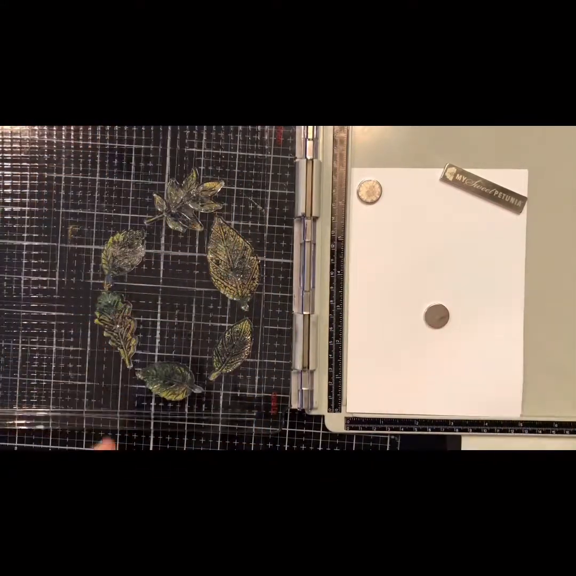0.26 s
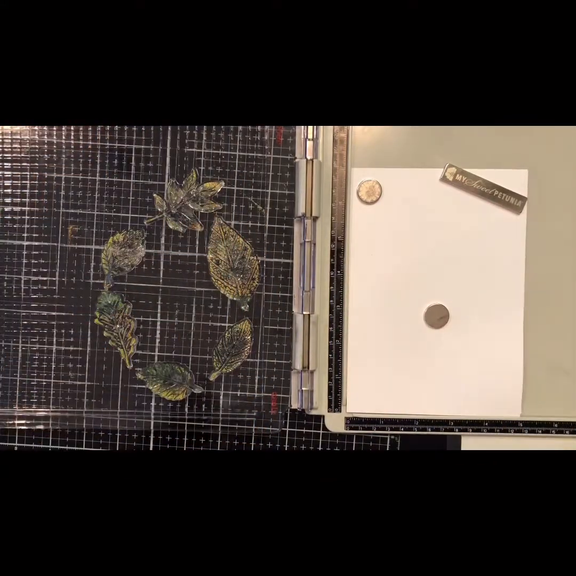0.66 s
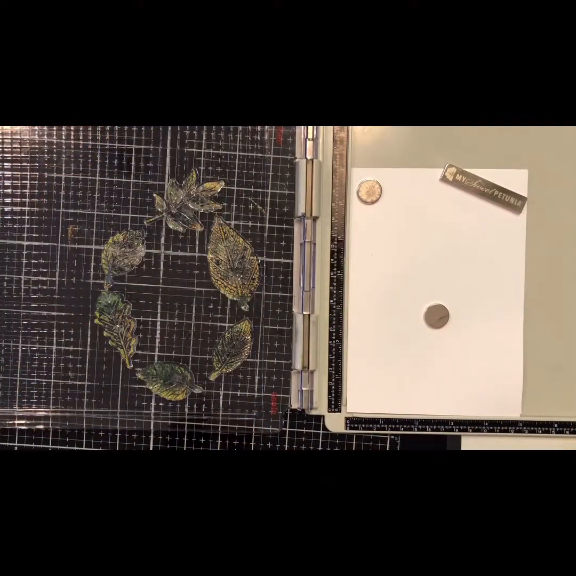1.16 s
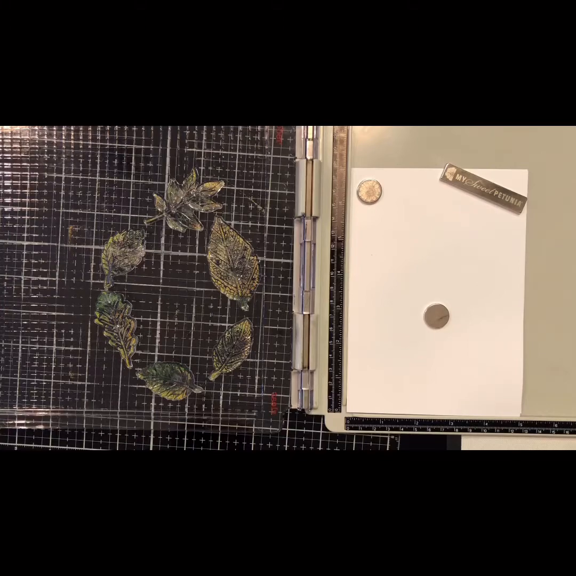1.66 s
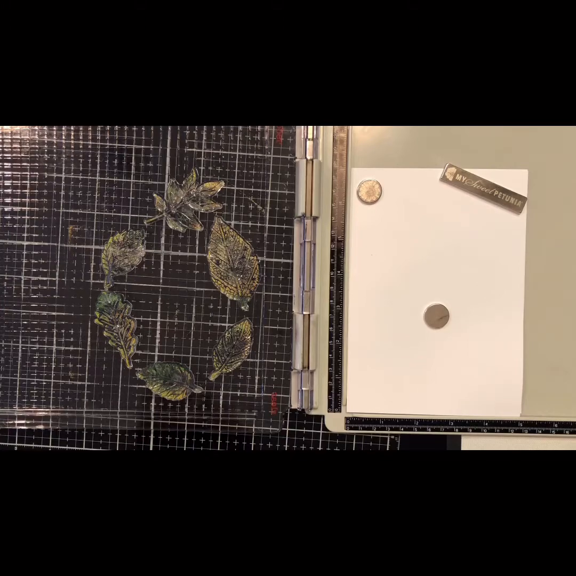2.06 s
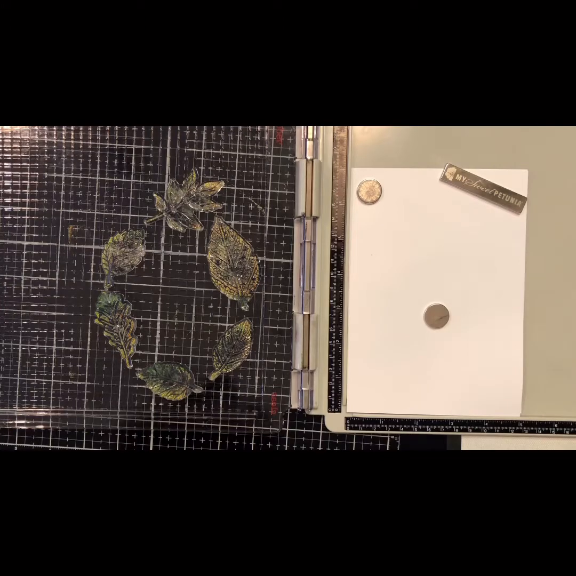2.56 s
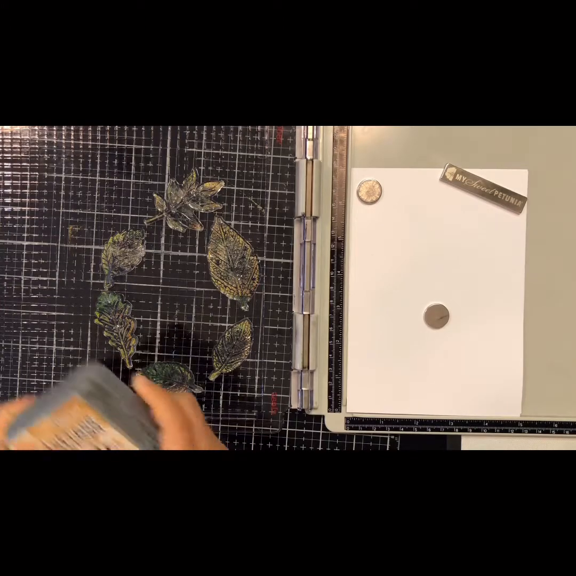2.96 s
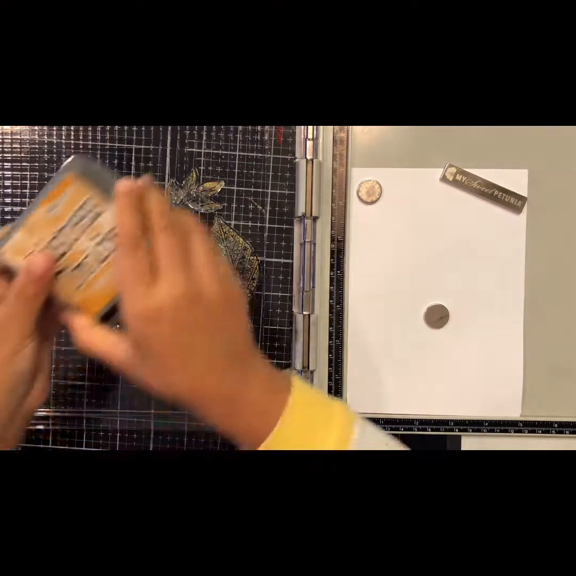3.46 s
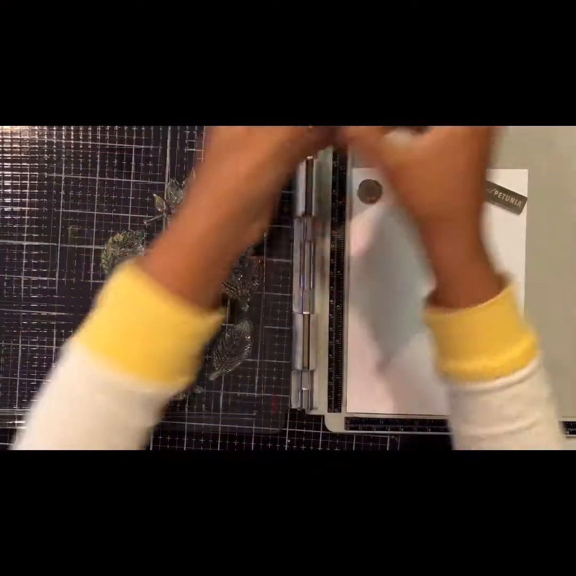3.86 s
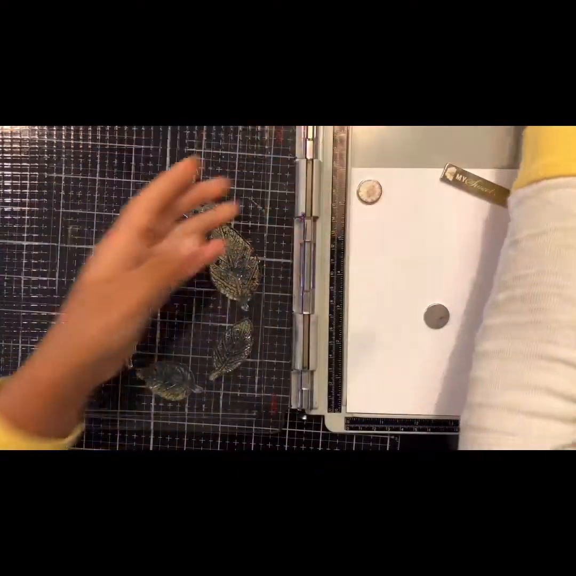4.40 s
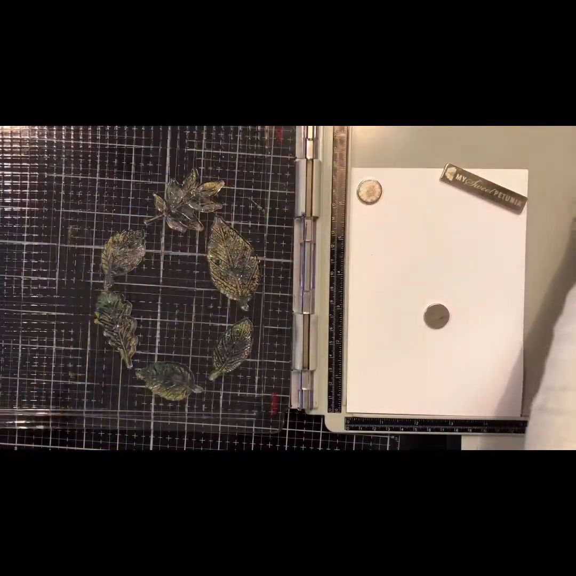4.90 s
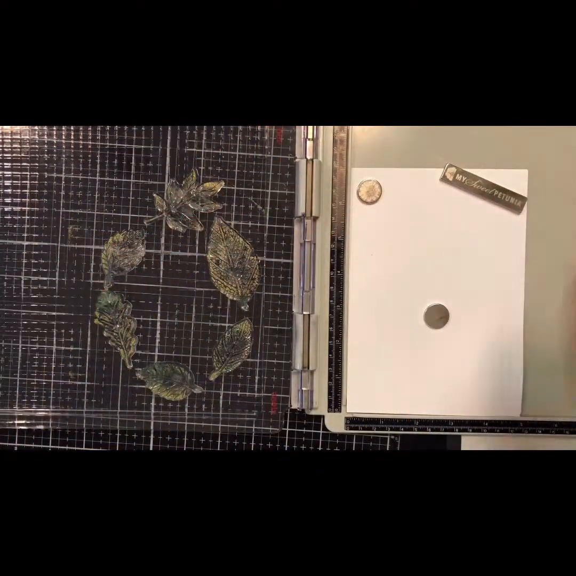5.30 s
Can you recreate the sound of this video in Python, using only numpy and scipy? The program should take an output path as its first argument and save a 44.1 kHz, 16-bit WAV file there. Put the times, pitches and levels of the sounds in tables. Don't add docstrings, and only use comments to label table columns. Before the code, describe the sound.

Quiet handling of plastic cases: one snap and a few hard knocks, then a pause with small ticks, then a loud clattering cluster.

```python
import sys
import numpy as np
from scipy import signal
from scipy.fft import rfft, irfft, next_fast_len
from scipy.io import wavfile
from scipy.ndimage import uniform_filter1d, map_coordinates

SR = 44100
rng = np.random.default_rng(int(sys.argv[2]) if len(sys.argv) > 2 else 0)


def transcribe(u):
    v = np.clip(np.atleast_2d(u).T, -1, 1)
    q = np.round(v * 32767).astype(np.int16)
    wavfile.write(sys.argv[1], SR, q)


def voltage_ratio(level):
    return 10 ** (np.asarray(level, float) / 20)


N = 244311
FAINT_TOP_HZ = 15950


def unit(x):
    return x / np.sqrt(np.mean(x ** 2) + 1e-20)


def along(points, hz):
    f, v = np.transpose(points)
    return np.interp(np.log(hz + 1), np.log(f + 1), v)


def wobble(rate):
    knots = rng.standard_normal(int(N * rate / SR) + 4)
    return map_coordinates(knots, [np.arange(N) * rate / SR])


def filtered(x, response):
    m = next_fast_len(len(x) + 4096)
    return irfft(rfft(x, m) * response(np.fft.rfftfreq(m, 1 / SR)), m)[:len(x)]


def peak(f, hz, width):
    return 1j * f * width / (hz * hz - f * f + 1j * f * width)


def modes(body):
    return lambda f: sum((-1) ** k * voltage_ratio(db) * peak(f, hz, width) for k, (hz, width, db) in enumerate(body))


def add(track, s, sound):
    part = track[round(s * SR):][:len(sound)]
    part += sound[:len(part)]


def rush(spectrum, grain_db, patchy_db):
    grainy = voltage_ratio(grain_db * wobble(700)) * rng.standard_normal(N)
    z = signal.stft(grainy, nperseg=512)[2]
    field = uniform_filter1d(rng.standard_normal(z.shape), size=4, axis=0)
    field = uniform_filter1d(field, size=10, axis=1)
    grains = signal.istft(z * voltage_ratio(patchy_db * unit(field)), nperseg=512)[1][:N]
    return unit(filtered(grains, lambda hz: voltage_ratio(along(spectrum, hz))))


def scrape(ms, size):
    u = np.arange(size) / SR / (abs(ms) / 3000)
    burst = rng.standard_normal(size) * u * np.exp(-u)
    for _ in range(3):
        z = rfft(burst)
        even = irfft(z / (np.abs(z) + 0.042 * np.abs(z).mean()), size)
        burst = even * (1 - np.exp(-4 * u)) * np.exp(-u / 4)
    return burst


def share_db(pitch_hz, layer_hz, fall_db, fall_up_db):
    octaves = np.log2(layer_hz / pitch_hz)
    return -fall_up_db * octaves if octaves > 0 else fall_db * octaves


# (frequency [Hz], decay by 60 dB [s])
WALL_DECAY = [(250, 0.77), (800, 0.49), (2000, 0.39), (5500, 0.42), (15000, 0.14)]


def walls():
    hz, t, z = signal.stft(rng.standard_normal(SR // 3), SR, nperseg=256)
    decay = voltage_ratio(-60 * t / along(WALL_DECAY, hz)[:, None])
    tail = signal.istft(z * decay, SR, nperseg=256)[1]
    t = np.arange(len(tail)) / SR
    tail = tail * np.clip(t / 0.0025, 0, 1) * (1 + 1.9 * np.exp(-t / 0.0066))
    return tail / np.linalg.norm(tail)


def evened(response, blur):
    return response / (np.abs(response) + 1e-3) ** blur


def knocks(body, far, hits, room_db, blur, grip_ms):
    out = np.zeros(N)
    for s, db, scrape_ms, hard_hz, wet_db in hits:
        soft = lambda f: 1 / (1 + 1j * f / hard_hz) ** 2
        blow = filtered(scrape(scrape_ms, size=2048), lambda f: modes(body)(f) * soft(f))
        ms = np.arange(len(blow)) / SR * 1000
        blow = blow * np.exp(-(ms / (abs(scrape_ms) + abs(grip_ms))) ** 2)
        blow = voltage_ratio(db) * blow / np.abs(blow).max()
        echo = filtered(walls(), lambda f: evened(modes(far)(f) * soft(f), blur) * (f < FAINT_TOP_HZ))
        add(out, s, blow)
        add(out, s, voltage_ratio(room_db + wet_db) * echo * np.linalg.norm(blow) / np.linalg.norm(echo))
    return out


# (frequency [Hz], density [dB per Hz])
AIR_COLOUR = [(15, -68.5), (25, -44.5), (48, -18), (118, -13), (138, -6.5), (266, -6.5), (296, -6),
              (470, -9.5), (952, -20), (1150, -30.5), (1280, -22.5), (2210, -36), (15200, -53.5),
              (16500, -54.5)]
# (frequency [Hz], level [dB rms])
FAN_LINES = [(59.2, -71), (149, -60.5), (186, -62.5), (237, -61.5), (296, -62), (355.5, -63),
             (414.5, -62.5), (545, -69)]
AIR_DB = -52.5


def room_tone():
    t = np.arange(N) / SR
    hum = np.zeros(N)
    for hz, db in FAN_LINES:
        level = voltage_ratio(db + 1.5 + 2.12 * wobble(14))
        hum += level * np.sin(2 * np.pi * hz * t + 0.65 * wobble(4) + 6 * rng.random())
    air_level = voltage_ratio(AIR_DB - 1.5 + 0.42 * wobble(5.6))
    return hum + air_level * rush(AIR_COLOUR, grain_db=-0.4, patchy_db=2.5)


# (start [s], hold [s], level [dB], pitch [Hz])
RUB_STROKES = [(0, 0.057, -64, 5000), (0.224, 0.058, -56, 714), (0.63, 0.59, -66, 2200),
               (1.695, 0.059, -58.5, 1110), (1.777, 0.027, -68.5, 6000), (1.923, 0.1, -70, 4460),
               (2.068, 0.044, -54.5, 1200), (2.11, 0.062, -65, 3700), (2.312, 0.11, -56, 1060),
               (2.447, 0.07, -66.5, 2000), (2.636, 0.15, -62.5, 4530), (2.9, 0.033, -63.5, 3860),
               (2.956, 0.055, -48, 930), (3.018, 0.059, -57, 3900), (3.14, 0.018, -61, 800),
               (3.237, 0.0084, -62, 2600), (3.333, 0.35, -66, 1670), (3.69, 0.09, -54.5, 1200),
               (1.506, 0.48, -76, 2410), (3.185, 0.0087, -66.5, 1800), (0.756, .03, -65, 8000),
               (4.17, 1.1, -68, 2160), (5.306, 0.11, -61.5, 4200), (5.487, 0.031, -49.5, 970)]
STROKE_RISE_DB_PER_S, STROKE_FADE_DB_PER_S = 348, 229
STROKE_FALL_DB, STROKE_FALL_UP_DB = 5.5, 12


def strokes(layer_hz, rest_db):
    t = np.arange(0, N / SR + .002, .002)
    power = voltage_ratio(2 * rest_db)
    for s, hold, db, pitch_hz in RUB_STROKES:
        rise_db = STROKE_RISE_DB_PER_S * np.maximum(s - t, 0)
        fade_db = STROKE_FADE_DB_PER_S * np.maximum(t - s - hold, 0)
        layer_db = db + share_db(pitch_hz, layer_hz, STROKE_FALL_DB, STROKE_FALL_UP_DB)
        power = power + voltage_ratio(2 * (layer_db - rise_db - fade_db))
    return np.interp(np.arange(N) / SR, t, np.sqrt(power))


# (frequency [Hz], density [dB per Hz])
PALM = [(250, -17.5), (500, 2), (950, 5), (1500, -8.5), (3000, -44.5)]
FINGERTIP = [(900, -28), (1700, 7), (2600, -0.5), (4200, -7), (7000, -18.5)]
CLOTH = [(2350, -33.5), (4000, -1), (6310, -3.5), (8540, -6.5), (15100, -7), (16200, -13.5), (16500, -52.5)]
# level of palm, fingertip, cloth [dB]
RESTING = (-64.5, -78.5, -84)


def rubbing():
    slips = wobble(90)
    palm = strokes(570, RESTING[0]) * voltage_ratio(0.6 * slips) * rush(PALM, grain_db=2.0, patchy_db=2.3)
    skin = strokes(2200, RESTING[1]) * voltage_ratio(1.2 * slips) * rush(FINGERTIP, grain_db=1.5, patchy_db=3.0)
    cloth = strokes(7200, RESTING[2]) * voltage_ratio(0.73 * slips) * rush(CLOTH, grain_db=-1.0, patchy_db=0.3)
    return palm + skin + cloth


# (time [s], peak [dB])
THUMB_CRACKLES = [(1.9924, -58), (2.0114, -58), (2.1894, -52), (2.3434, -58), (2.3524, -55), (2.3614, -57),
                  (2.3664, -57), (2.3714, -57), (2.3774, -58), (2.3824, -63), (2.4414, -63), (2.4448, -50),
                  (2.4544, -59), (2.4838, -54), (2.6494, -61), (2.6894, -54), (2.7194, -56), (3.0094, -44),
                  (3.0394, -54), (3.0594, -54)]
CRACKLE_MS, CRACKLE_DB = 0.75, -2


def crackles():
    out = np.zeros(N)
    for s, db in THUMB_CRACKLES:
        part = filtered(scrape(CRACKLE_MS, size=256), lambda f: peak(f, 5300, 16000))
        add(out, s, voltage_ratio(db + CRACKLE_DB) * part / np.abs(part).max())
    return out


# (time [s], peak [dB], pitch [Hz])
FINGER_TICKS = [(.525, -55.5, 3900), (.9793, -54, 6500), (1.001, -47, 1400), (1.6535, -46.5, 15000),
                (1.61, -57, 8400), (1.661, -63, 4500), (2, -44, 3500), (1.749, -48, 4100),
                (1.79, -42, 2300), (1.769, -52, 14000), (1.6, -52, 3200), (1.886, -54, 2900),
                (1.9256, -52, 3100), (1.5, -39, 3000), (2.1064, -44, 10000), (2.4, -40, 1700),
                (2.5, -54, 12000), (2.2693, -45, 2500), (2.285, -51, 1800), (2.2056, -57, 13000),
                (2.4065, -57, 4500), (2.416, -62, 7000), (5.4055, -59, 4700), (2.4843, -41, 1500),
                (.5779, -48, 1300), (2.539, -49, 1420), (2.297, -52, 1400), (3.5, -48, 3300),
                (2.8, -39, 2900), (4.092, -55.5, 3300), (3.7, -49, 1400), (2.7642, -49.5, 4000),
                (4.154, -40, 2000), (4.1655, -46, 2300), (4.913, -40, 1100)]
TICK_MS = 2.8
TICK_FALL_DB, TICK_FALL_UP_DB = 12.5, 9


def ticks():
    out = np.zeros(N)
    for s, db, pitch_hz in FINGER_TICKS:
        push = scrape(TICK_MS, size=512)
        for hz, width in [(1400, 1600), (3400, 3800), (6500, 5000), (12500, 8000)]:
            part = filtered(push, lambda f: peak(f, hz, width) ** 2)
            part_db = db + share_db(pitch_hz, hz, TICK_FALL_DB, TICK_FALL_UP_DB)
            add(out, s, voltage_ratio(part_db) * part / np.abs(part).max())
    return out + voltage_ratio(-21.5) * signal.fftconvolve(out, walls())[:N]


# (time [s], slips per second [Hz], level [dB], snap [dB])
THUMB_CREAKS = [
    [(2.324, 150, -59, -84), (2.35, 118, -56, -78), (2.386, 210, -58, -76)],
    [(2.436, 170, -66, -70), (2.46, 190, -68, -74)],
    [(2.9, 150, -61, -78), (2.93, 160, -57, -71), (2.97, 180, -59, -69), (3.0, 187, -50, -77.5),
     (3.035, 187, -51.5, -80), (3.047, 270, -49, -89)],
    [(5.458, 270, -60, -76), (5.475, 260, -55, -68), (5.495, 220, -51.5, -65), (5.515, 220, -52.5, -65),
     (5.54, 165, -49, -65)],
]
# (frequency [Hz], width [Hz], level [dB])
HELD_CASE = [(487, 360, -2), (1110, 360, 3), (2500, 1700, -24)]


def creaks():
    out, t = np.zeros(N), np.arange(N) / SR
    for rows in THUMB_CREAKS:
        s, rate, db, snap_db = np.transpose(rows)
        turns = np.cumsum(np.interp(t, s, rate) * (1 + .02 * wobble(60))) / SR
        slips = np.diff(np.floor(turns), prepend=0) * voltage_ratio(1.5 * rng.standard_normal(N))
        snaps = filtered(slips, lambda f: 1 / (1 + 1j * f / 250)) * rng.standard_normal(N)
        pushes = unit(filtered(slips, modes(HELD_CASE)))
        snaps = unit(filtered(snaps, lambda f: peak(f, 4600, 12000) ** 2))
        out += pushes * voltage_ratio(np.interp(t, s, db, -200, -200))
        out += snaps * voltage_ratio(np.interp(t, s, snap_db, -200, -200))
    return out + voltage_ratio(-18.5) * signal.fftconvolve(out, walls())[:N]


# (time [s], peak [dB], scrape length [ms], hardness [Hz], room share [dB])
LID_RIM = [(1200, 220, -5), (1580, 200, 1.5), (2050, 200, -4), (2630, 170, -2.5), (3530, 260, -8),
           (4230, 300, -13), (5300, 780, -14), (7500, 2000, -21), (12000, 4000, -23)]
RIM_TOUCHES = [
    (3.2405, -40, 2.9, 5000, -1),
    (3.243, -38, 2.8, 9000, -4),
    (3.4688, -49, 3.5, 5000, -3),
    (3.5185, -43, 2.6, 3500, -3),
    (4.585, -51, 1.6, 9060, -1),
    (4.592, -35, 3.2, 7000, 1),
    (4.6, -40, 2.5, 4000, -1.5),
]


def rim_touches():
    return knocks(LID_RIM, LID_RIM, RIM_TOUCHES, room_db=-8.0, blur=.2, grip_ms=4.5)


LID_AIR = [(584, 45, 0)]
LID_AIR_HITS = [
    (4.1775, -27, 1.7, 2000, -8),
]


def hollow():
    return knocks(LID_AIR, LID_AIR, LID_AIR_HITS, room_db=-9, blur=0.12, grip_ms=25)


TABLE_TOP = [(95.5, 82, -10), (214, 96, 1)]
TABLE_THUDS = [
    (0.791, -47, 2.5, 500, -6.5),
    (4.2945, -36, 2.5, 500, -3),
]


def table_top():
    return knocks(TABLE_TOP, TABLE_TOP, TABLE_THUDS, room_db=-9.5, blur=.1, grip_ms=12)


PAD_BASE = [(450, 240, -13.5), (964, 197, -5), (1305, 105, 0.5), (2000, 160, -10), (3060, 300, -9.5),
            (4270, 160, -9), (5380, 410, -12.5), (7540, 4100, -26.5), (10700, 510, -17.5),
            (14000, 1200, -23)]
PAD_BASE_FAR = [(450, 240, -19), (930, 280, -8.5), (1350, 126, 1.5), (2130, 300, -10.5), (3060, 350, -11),
                (4200, 370, -12), (5200, 480, -16.5), (6000, 300, -17), (8000, 4000, -22.5),
                (13000, 3000, -27)]
BASE_TOUCHES = [
    (1.694, -40, 4.6, 14000, -3),
    (1.7262, -43.5, 2, 5000, -2),
    (2.6335, -47, 1.7, 9000, -5),
    (2.6414, -47, 2.6, 4940, 3),
]


def base_touches():
    return knocks(PAD_BASE, PAD_BASE_FAR, BASE_TOUCHES, room_db=-11, blur=.3, grip_ms=4.0)


BASE_KNOCKS = [
    (1.0866, -34.5, 2.35, 5000, -1),
    (1.1374, -31, 1.1, 2930, -4),
    (1.14, -13.5, 4.1, 11900, -0.091),
]


def base():
    return knocks(PAD_BASE, PAD_BASE_FAR, BASE_KNOCKS, room_db=-10.0, blur=.05, grip_ms=7.8)


PAD_CASE = [(147, 34, -11), (480, 420, -13), (790, 120, -3), (1200, 95, 3), (1520, 51, -1),
            (2350, 120, -26.5), (3040, 840, -4.5), (4600, 208, -6), (5560, 600, -7), (8140, 1816, -13.5),
            (10300, 1700, -11), (15100, 1100, -16)]
PAD_CASE_FAR = [(500, 400, -11.5), (800, 120, -11), (1200, 120, 3), (1496, 52, -2), (2300, 180, -9.5),
                (3200, 340, -5), (3900, 400, -12.5), (4460, 250, -12), (5700, 400, -12.5),
                (8300, 2000, -18), (12000, 5000, -19.5)]
CASE_KNOCKS = [(0.758, -44, 6, 1500, 0), (0.7753, -40, 3.1, 1510, -7.5), (0.782, -32.5, 3.5, 4000, 0),
               (0.7848, -36, 3, 6000, -2), (0.789, -14, 2.1, 9000, 1), (0.7904, -9.5, 2.07, 14000, -0.5),
               (0.7934, -13.5, 1.9, 5000, 1.5), (0.7965, -29.5, 1.5, 14000, -5),
               (0.7991, -23.5, 1.2, 9300, -11), (0.8098, -28.5, 4.7, 2970, -10.5),
               (0.9366, -30.5, 7.1, 4260, 1.5)]


def case():
    return knocks(PAD_CASE, PAD_CASE_FAR, CASE_KNOCKS, room_db=-8.0, blur=.05, grip_ms=3.4)


BOUNCING_CASE = [(570, 270, -14), (1870, 230, 10), (2410, 310, -3), (3370, 280, -10), (4010, 280, -2),
                 (4490, 73, 1.5), (5600, 360, -12.5), (6120, 180, -11), (7370, 260, -13), (8000, 99, -10.5),
                 (9700, 190, -16), (10850, 500, -25), (13800, 1500, -23.5)]
BOUNCES = [(4.779, -15, 2.18, 9300, -0.5), (4.785, -29, 1.7, 5000, -6), (4.7917, -32, 2.7, 3000, -6),
           (4.803, -17, 1.6, 9300, -1.5), (4.81, -30.5, 3.6, 3000, 0), (4.8267, -25.5, 0.71, 4080, -16),
           (4.831, -29, 0.38, 2990, -11), (4.966, -40, 3.4, 2000, 6), (4.9841, -22, 1.4, 4730, -0.4),
           (4.9929, -26.5, 2.5, 7900, -7), (4.999, -28, 1.65, 7940, -0.5)]


def bounce():
    return knocks(BOUNCING_CASE, BOUNCING_CASE, BOUNCES, room_db=-4, blur=0.057, grip_ms=8.9)


PAD_STACK = [(251, 83, -3.5), (464, 180, -4), (930, 84, -0.5), (1303, 150, -2.5), (1970, 370, -5),
             (2770, 300, -3.5), (3640, 160, -4), (4800, 760, -7), (7260, 730, -10), (8800, 1500, -10),
             (13370, 8600, -13)]
STACK_KNOCKS = [
    (4.2923, -6, 1, 18000, 1),
    (4.2939, -9.5, 1.86, 3500, 0.2),
    (4.2957, -17.5, 1.1, 900, 1.5),
]


def stack():
    return knocks(PAD_STACK, PAD_STACK, STACK_KNOCKS, room_db=-9.0, blur=.05, grip_ms=5.5)


PLASTIC_TRAY = [(966, 95, -12.5), (1610, 400, -18), (2000, 296, 4), (2500, 200, -16.5), (3510, 110, -8.5),
                (4590, 170, -3), (5470, 91, 4), (6440, 160, -4), (7360, 290, -6), (8320, 200, -16.5),
                (9900, 110, -14.5), (11040, 430, -12), (12100, 510, -19.5), (15100, 810, -19)]
PLASTIC_TRAY_FAR = [(950, 100, -9), (1720, 97, -6.5), (1940, 370, 1), (2840, 300, -9), (3640, 130, 1),
                    (4610, 160, -5.5), (5380, 78, -2), (6340, 180, -9.5), (7320, 290, -12),
                    (8250, 120, -11), (9840, 150, -15), (11100, 420, -20.5), (12100, 430, -16.5),
                    (15080, 2500, -22.5)]
TRAY_KNOCKS = [
    (4.6067, -6.5, 0.81, 14000, -4),
    (4.6075, -4.5, 1.7, 12000, -0.5),
    (4.6117, -18, 1.4, 4000, -1.5),
]


def tray():
    return knocks(PLASTIC_TRAY, PLASTIC_TRAY_FAR, TRAY_KNOCKS, room_db=-7.5, blur=0.13, grip_ms=5.3)


LID_CATCH = [(1320, 200, -7), (1940, 200, 0.5), (2750, 200, -3.5), (3700, 206, -2), (4520, 350, -6),
             (5470, 200, -8), (6000, 600, -8.5), (7610, 1500, -14), (11000, 3500, -21), (15670, 1400, -22)]
LID_CATCH_FAR = [(955, 240, -7), (1330, 85, -4), (2000, 380, -2.5), (2660, 170, 3.5), (3650, 230, -3),
                 (4300, 300, -5), (4950, 300, -8), (6000, 590, -10), (8000, 2500, -18.5),
                 (12000, 4000, -22.5)]
CATCH_SNAPS = [
    (0.6323, -8, 1.3, 9240, -2),
    (0.6339, -12, 1, 7000, -8.5),
]


def catch():
    return knocks(LID_CATCH, LID_CATCH_FAR, CATCH_SNAPS, room_db=-7.5, blur=.05, grip_ms=3.0)


PAD_LID = [(586, 48, -7.5), (977, 720, -13), (1385, 480, 1.5), (1756, 406, 3), (3160, 350, -9),
           (4390, 800, -12.5), (6930, 600, -10), (9400, 1500, -17.5), (12900, 4000, -21)]
PAD_LID_FAR = [(570, 120, -16), (1050, 250, -9.5), (1560, 310, -3.5), (2500, 600, -7.5), (3300, 500, -8.5),
               (4200, 700, -13), (5320, 600, -16), (6700, 550, -14.5), (9500, 2000, -18),
               (13000, 4000, -25)]
LID_SNAPS = [
    (4.1764, -4.5, 1.5, 4520, 4.5),
    (4.1877, -7, 2.4, 18200, -3),
    (4.2083, -39, 1.2, 2500, -2.5),
    (4.2139, -15.5, 3.9, 5500, -6),
    (4.219, -17.5, 0.81, 5000, -9.5),
    (4.2212, -22, 0.89, 2500, -14.5),
    (4.228, -22.5, 0.54, 3000, -15.5),
    (4.234, -26, 1.2, 2200, -12),
    (4.247, -28, 1.16, 2500, 11),
]


def lid():
    return knocks(PAD_LID, PAD_LID_FAR, LID_SNAPS, room_db=-12, blur=.1, grip_ms=3.5)


def scene():
    quiet = rubbing() + room_tone() + creaks() + ticks() + crackles()
    quiet = filtered(quiet, lambda f: f < FAINT_TOP_HZ)
    pads = catch() + case() + (base() + lid()) + (stack() + tray()) + bounce()
    pads = filtered(pads, lambda f: (1j * f / (1j * f + 120)) ** 2)
    touches = rim_touches() + base_touches()
    low = hollow() + table_top()
    return (pads + quiet + touches + low)[None]


def roll_off(x):
    return signal.sosfilt(signal.butter(12, 16970, fs=SR, output="sos"), x)


def record(dry):
    kept = filtered(dry[0], lambda f: 1 / (1 + (f / 16550) ** 240))
    return roll_off(kept[None])


dry = scene()
out = record(dry)
transcribe(out)
```